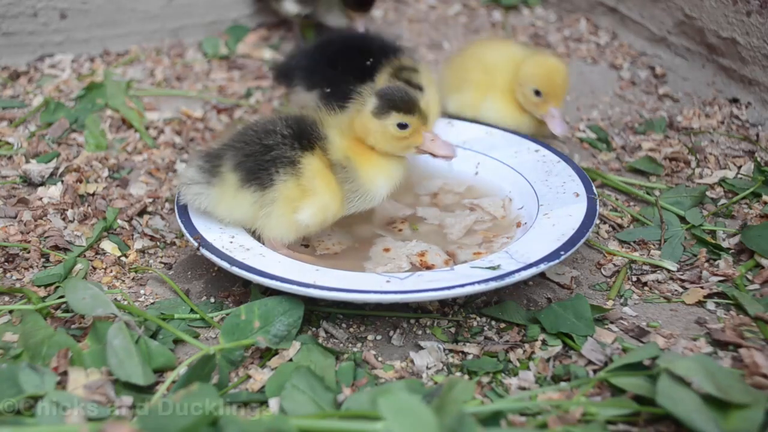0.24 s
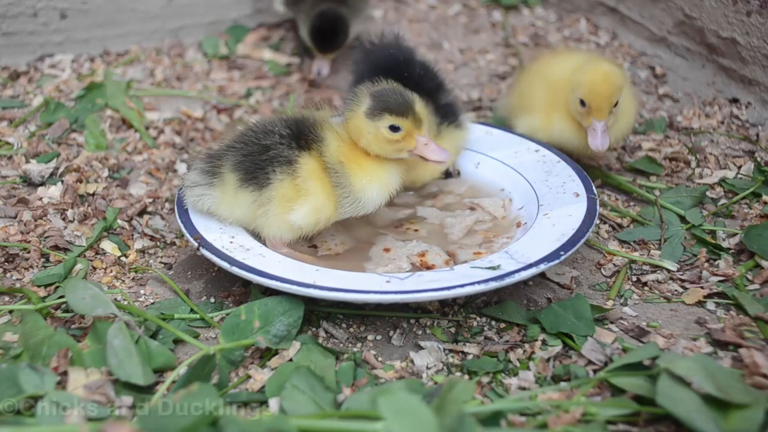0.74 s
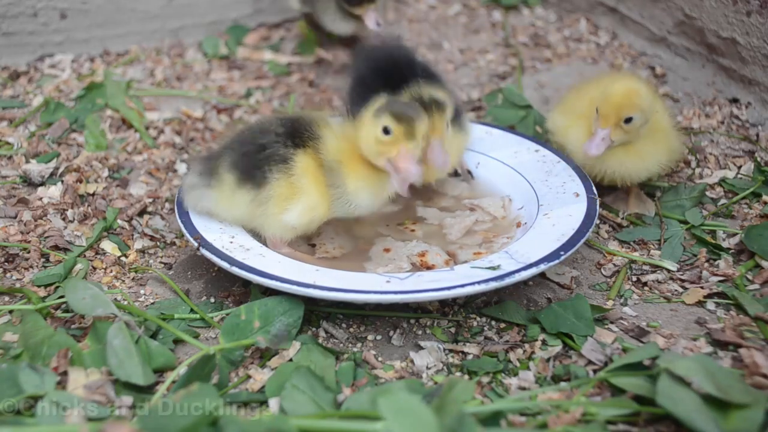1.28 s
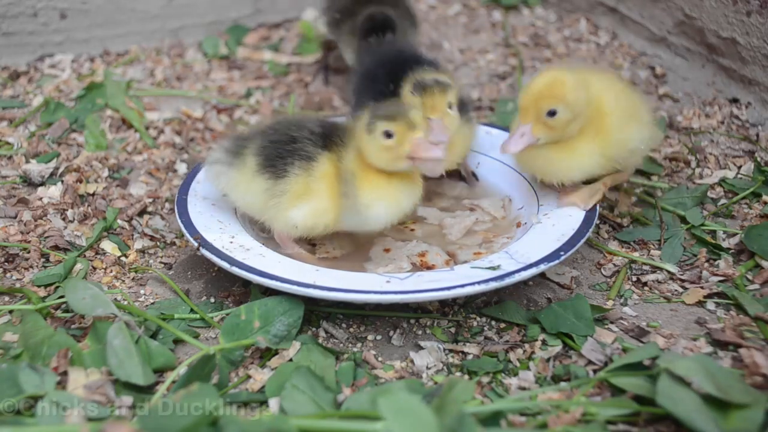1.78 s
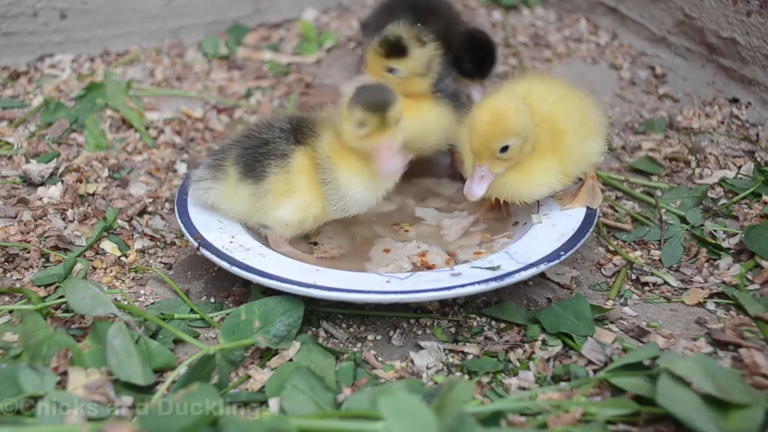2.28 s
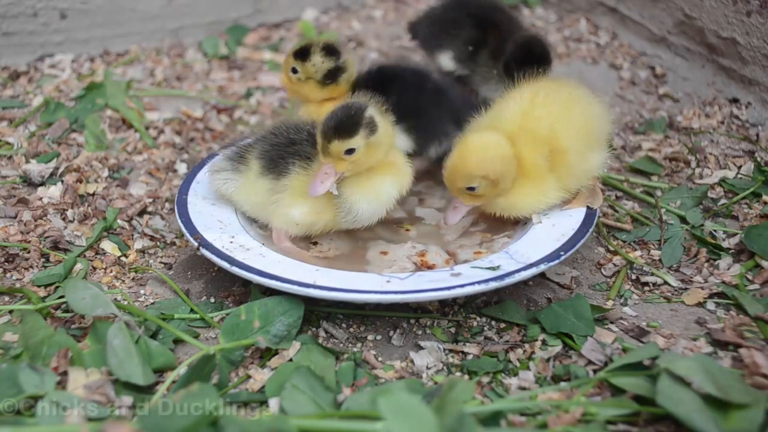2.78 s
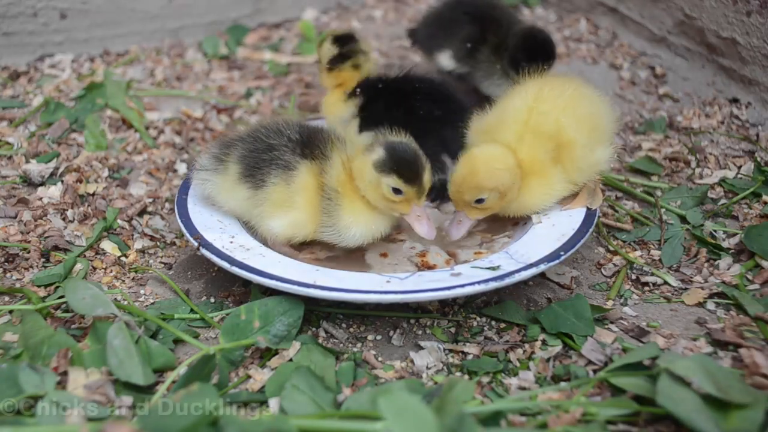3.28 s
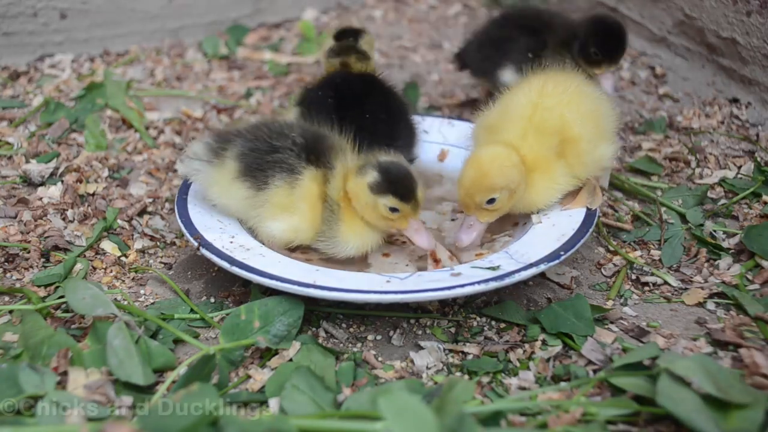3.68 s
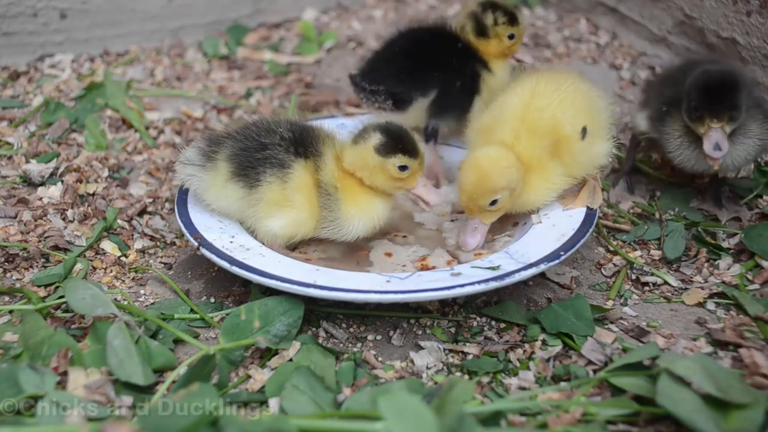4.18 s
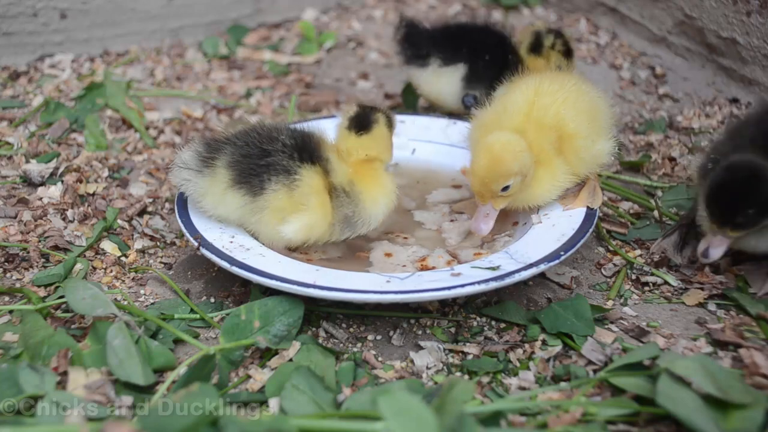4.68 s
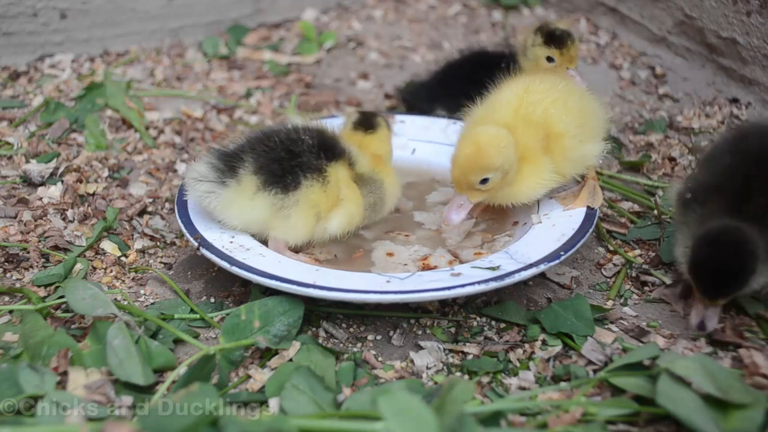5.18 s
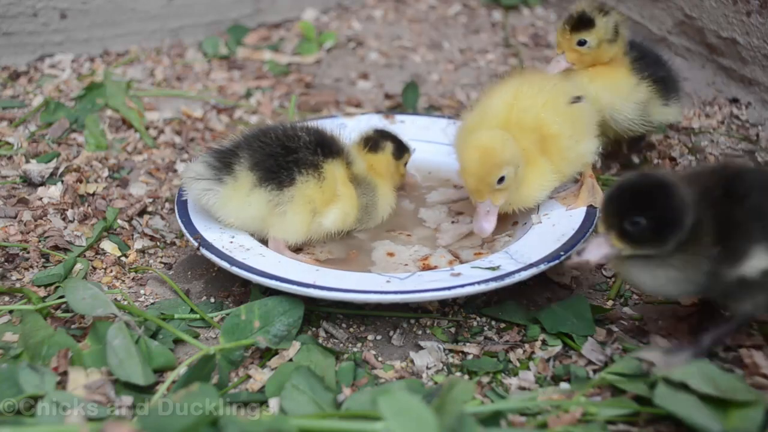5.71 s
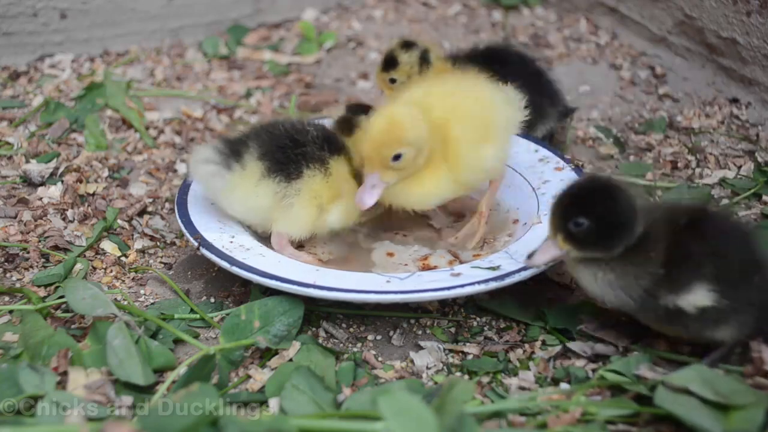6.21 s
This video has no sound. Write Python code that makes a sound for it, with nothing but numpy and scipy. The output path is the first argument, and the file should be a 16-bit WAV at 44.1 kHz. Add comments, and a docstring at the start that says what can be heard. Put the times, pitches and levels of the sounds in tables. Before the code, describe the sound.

Outdoors in a quiet yard, a close microphone catches a small brood of ducklings: pure, trembling chirps and quick downward whistles over a faint murmur of other birds. Dry ticks of bills on a hard dish and tiny wet dabbling come and go. A low engine idle throbs far off, then disappears midway. Later the whistles crowd together and two longer high squeals plunge in pitch.

```python
"""Ducklings at a plate of water

Close to the camera on leaf litter, ducklings give arched peeps, sliding whistles and two long high cries:
trembling near-sine tones, echoed by ground, plate and wall. Bills tick on the plate (noise and ringing modes)
and dabble (dense narrow-band pops). Some way off an engine idles and fades, as low booms with a rumble;
round it all lies quiet outdoor air of coloured noise, with a light wind and one soft bump."""
import sys
import numpy as np
from scipy import signal
from scipy.fft import rfft, irfft, next_fast_len
from scipy.io import wavfile
from scipy.ndimage import uniform_filter1d

SR = 44100
rng = np.random.default_rng(int(sys.argv[2]) if len(sys.argv) > 2 else 0)


def unload_audio(sound):
    """Save the sound as a 16-bit wav file, at the path given as the first command line argument."""
    columns = np.transpose(np.atleast_2d(sound))
    # keep every value between -1 and 1, then stretch to whole-number steps
    steps = np.round(np.clip(columns, -1, 1) * 32767)
    wavfile.write(sys.argv[1], SR, steps.astype(np.int16))


N = 284445
TIME = np.arange(N) / SR  # seconds

# Levels in the tables are relative: gains, chance and filters act on them later.
# Arched peeps close by. Each row: start in seconds, length in seconds, top pitch in Hz, depth of the arch
# as a share of the top, level in dB, loudest point as a share of the call, echo strength in dB.
PEEP_CALLS = [(0.072, 0.044, 2870, 0.32, -20, 0.64, -3.5), (0.337, 0.036, 2690, 0.18, -18.5, 0.59, -9),
              (0.504, 0.046, 2820, 0.2, -12.5, 0.65, -10), (0.873, 0.031, 2430, 0.19, -14.5, 0.47, -17.5),
              (1.426, 0.043, 2114, 0.12, -22.5, 0.36, -8), (1.543, 0.02, 2840, 0.3, -7, 0.54, -12.5),
              (1.919, 0.039, 2704, 0.19, -22.5, 0.92, -14), (2.108, 0.036, 3095, 0.21, -27, 0.64, -7),
              (3.647, 0.044, 2436, .2, -14, 0.59, -15), (3.799, 0.027, 2380, 0.14, -13, 0.62, -18),
              (3.9, 0.042, 2780, 0.27, -13.5, 0.17, -11), (4.572, 0.047, 2325, 0.21, -24.5, 0.8, -4.5),
              (4.707, 0.048, 2302, 0.22, -22, 0.5, -2), (5.85, 0.041, 2787, 0.39, -20.5, 0.43, -7),
              (5.961, 0.048, 2500, 0.34, -20.5, 0.51, 0.5), (6.098, 0.056, 3385, 0.45, -18, 0.33, -11.5)]
# Sliding whistles. Each row: middle in seconds, length in seconds, pitch there in Hz,
# slide in octaves per second, level in dB, loudest point as a share of the call.
WHISTLE_CALLS = [(.139, 0.083, 4270, -2, -38.5, 0.55), (.193, .05, 3515, -4.5, -22.5, 0.4),
                 (.262, 0.045, 3570, -4, -21, 0.33), (.394, 0.05, 2660, -0.5, -26.5, .2),
                 (.61, 0.059, 2685, 5.5, -37.5, 0.55), (.655, 0.087, 3410, -1, -39, 0.59),
                 (.695, 0.028, 2447, 1, -31, 0.38), (1.288, 0.064, 2643, -4, -23, 0.53),
                 (1.405, 0.072, 2910, -4.5, -27, 0.7), (1.523, 0.042, 2960, 3, -28.5, 0.89),
                 (1.56, 0.017, 5080, -6, -32, 0.6), (1.566, 0.049, 4386, -6, -21, 0.39),
                 (1.613, 0.027, 3510, -6, -16, 0.37), (1.652, 0.048, 3156, -2.5, -22, 0.62),
                 (1.674, 0.061, 3500, -1.5, -33.5, 0.63), (1.825, 0.033, 3460, 2, -35.5, 0.54),
                 (1.847, 0.07, 4350, -2.5, -20, 0.58), (1.889, 0.047, 3654, -6, -17, 0.49),
                 (2.082, 0.05, 2950, 2, -37.5, 0.44), (2.09, 0.064, 3840, 2.5, -48.5, .7),
                 (2.258, 0.042, 2712, -2, -27, .25), (2.408, 0.026, 3690, -4, -23, 0.92),
                 (2.455, 0.014, 2678, 4.5, -24, 0.25), (2.562, 0.074, 4340, -4.5, -37, 0.43),
                 (2.68, 0.049, 2697, -6, -14.5, 0.35), (2.71, 0.032, 2690, 3, -37.5, 0.3),
                 (2.757, 0.015, 2790, -3, -37.5, .5), (2.786, 0.065, 4455, -3, -23, 0.51),
                 (2.886, 0.016, 2640, -4, -35.5, 0.33), (2.928, 0.037, 4480, -6.5, -39, 0.42),
                 (3.094, 0.025, 2907, -2.5, -28.5, 0.54), (3.286, 0.033, 2755, -8.5, -20.5, .5),
                 (3.322, 0.035, 4100, -3.5, -22, 0.67), (3.352, 0.018, 3558, -3.5, -15, 0.39),
                 (3.553, 0.07, 4160, -6, -40.5, 0.57), (3.755, 0.053, 4650, -4, -30, 0.45),
                 (3.79, 0.014, 3660, -7, -18.5, 0.43), (3.859, 0.033, 4390, -6.5, -37.5, 0.52),
                 (3.987, .08, 4220, 2, -49.5, 0.38), (4.01, 0.018, 2690, 7, -27.5, 0.33),
                 (4.153, 0.04, 2880, -8, -34, 0.62), (4.19, 0.058, 4300, 1, -36, 0.9),
                 (4.357, 0.037, 2936, 0, -36.5, .6), (4.525, 0.06, 2936, 0.5, -26.5, 0.42),
                 (4.604, 0.066, 3110, 3.5, -35, 0.51), (4.656, 0.048, 4275, -0.5, -29, 0.86),
                 (4.657, 0.047, 2370, -5, -40.5, 0.46), (4.676, 0.033, 2960, 2, -29, 0.43),
                 (4.711, 0.038, 3400, -1.5, -22, 0.44), (4.791, 0.055, 4445, 1, -21, 0.23),
                 (4.81, .04, 3150, 7, -40.5, 0.57), (5.079, 0.03, 3280, 2, -36, .5),
                 (5.155, 0.081, 4290, -1, -47.5, .5), (5.313, 0.071, 4365, -1, -20.5, 0.26),
                 (5.356, 0.043, 2894, 1.5, -37, 0.49), (5.425, .11, 3680, -3, -34, 0.68),
                 (5.46, 0.068, 3044, -0.5, -16.5, 0.8), (5.525, .074, 3590, -0.5, -28, 0.44),
                 (5.575, 0.065, 4730, -3.5, -26, 0.38), (5.6, 0.045, 2984, -7, -32.5, .45),
                 (5.66, 0.084, 4610, -3, -44, .5), (5.69, 0.047, 3310, 1.5, -32.5, .5),
                 (5.783, 0.057, 3480, -1, -40, 0.65), (5.826, 0.053, 4506, -5.5, -27, 0.26),
                 (5.872, 0.058, 4150, -1.5, -33, 0.49), (5.986, 0.076, 4410, -1.5, -30.5, .5),
                 (6.05, 0.064, 2700, -1.5, -39.5, .5), (6.052, 0.052, 4110, 0, -29, 0.58),
                 (6.157, 0.048, 3660, -8.5, -14.5, 0), (6.18, 0.077, 2868, -1, -18.5, 0),
                 (6.24, .04, 4125, 1.5, -28, 0.6), (6.287, 0.08, 4220, -4, -21.5, 0.61),
                 (6.342, 0.034, 3043, -7.5, -21, 0.53)]
# Long high cries. Each row: start in seconds, length in seconds, top pitch in Hz, level in dB.
CRY_CALLS = [(5.496, .135, 5450, -16.5), (5.998, 0.15, 5780, -21)]
# Loudness of the rest of the brood. Each row: time in seconds, level of its calls in dB.
BROOD_LEVEL = [(0, -50), (1.1, -50), (1.8, -46), (2.7, -51), (3.2, -59), (4.2, -54.5), (4.75, -42),
               (5.1, -46), (5.55, -35), (6.15, -46), (6.45, -60)]
# Echoes from ground, plate and wall. Each row: delay in seconds, level in dB.
REFLECTIONS = [(.00093, -35.5), (.0023, -36), (.0046, -13), (.0085, -12), (0.0144, -41.5)]
# Louder bill taps on the plate. Each row: time in seconds, level in dB, brightest ring in Hz,
# level in dB of the dull knock against the tap.
BILL_TAPS = [(0.4342, -27.5, 8850, -21), (0.54, -31, 8700, 5), (.56, -31.5, 10700, 15),
             (0.5686, -28, 6560, 16), (.6144, -34.5, 8870, -18), (0.8968, -32, 9700, -23),
             (1.72, -28, 8600, -10), (3.3417, -31, 7740, -36), (3.442, -34.5, 7740, -6),
             (3.608, -43.5, 7750, -1), (3.679, -41.5, 7480, 1), (3.7637, -38.5, 7400, 1),
             (3.943, -44, 8410, 16), (3.9873, -38.5, 8600, -19), (4.0466, -40.5, 7150, -13),
             (4.099, -25.5, 7370, -5), (4.225, -33.5, 8530, -6), (5.0427, -23.5, 6240, -5.5),
             (5.445, -27, 7500, -6), (5.515, -23, 6980, -26), (5.5743, -29.5, 9740, -24),
             (5.7138, -38, 7500, -16), (6.2546, -30, 12360, -8), (6.3913, -22, 7480, -6.5)]
# What the plate rings with. Each row: pitch in Hz, level in dB, time to fall 60 dB in seconds.
PLATE_MODES = [(5180, 4, 0.042), (6160, 7, 0.053), (7440, 16.5, 0.044), (8380, 6, 0.092), (7800, 6, 0.12),
               (9770, 17, 0.039), (10700, -13.5, 0.034), (13600, -1, 0.033)]
# The plate's hum after a firmer knock: time in seconds, pitch in Hz, time to fall 60 dB in seconds, level in dB.
FIRM_KNOCK_HUM = (.56, 480, 0.8, -40)
# Bouts of dabbling and shuffling. Each row: middle in seconds, length in seconds, level in dB.
DABBLE_BOUTS = [(0.056, 0.62, -51.5), (0.53, 0.31, -46.5), (1.13, 0.19, -53), (1.858, 0.13, -47),
                (4.098, 0.97, -56.5), (5.65, 1, -53.5)]
# Spectrum of the water sounds. Each row: frequency in Hz, level in dB.
WATER_SPECTRUM = [(2000, 13.5), (4000, -2), (5500, -5), (7000, 4), (8600, 7), (10000, -0.5), (12000, -10.5),
                  (15500, -16)]
# Idling engine some way off. Each row: time in seconds, level in dB, exhaust boom in Hz.
ENGINE_IDLE = [(0, -30, 111.6), (.7, -29.5, 134), (.85, -34, 119.7), (1.3, -29.5, 142), (1.7, -32, 138),
               (2.05, -30, 94.4), (2.35, -35.5, 102.8), (3.9, -38.5, 108), (4.2, -48, 100.7),
               (5.25, -51.5, 90), (5.45, -59, 94), (6.45, -64, 94)]
# Its firing rate. Each row: time in seconds, firings per second in Hz.
FIRING_RATE = [(0, 22.2), (1.5, 22.78), (2.2, 21.74), (2.7, 20.71), (4, 20.55), (6.45, 19.9)]
# One soft low bump: middle in seconds, pitch in Hz, length in seconds, level in dB.
SOFT_BUMP = (4.392, 322, .031, -20.5)
# Spectrum of the outdoor air. Each row: frequency in Hz, level in dB.
AIR_SPECTRUM = [(20, -39.5), (45, -23.5), (85, 3.5), (170, -16.5), (350, -15.5), (530, -19.5), (900, -18.5),
                (1300, -22.5), (2000, -30), (3900, -33.5), (5500, -37), (8400, -37.5), (12000, -44),
                (15500, -61)]
# Loudness of the air. Each row: time in seconds, level of its middle range in dB.
AIR_LOUDNESS = [(0, -53.5), (.6, -55), (1.4, -55), (2.7, -55), (3.6, -55.5), (4.3, -55.5), (6.45, -57)]

# A call opens and closes within CALL_EDGE and rounds its peak over about CALL_HOLD (shares of its length).
CALL_EDGE, CALL_HOLD = 0.12, 0.078
PEEP_BEND = 1.7  # shape of a peep's arch: 1 = a roof, 2 = a dome
# A cry climbs by CRY_RISE (share of its top pitch), crests at CRY_CREST (share of its length),
# then plunges by CRY_FALL (share of its top pitch) while growing louder by CRY_SWELL_DB.
CRY_RISE, CRY_CREST, CRY_FALL, CRY_SWELL_DB = 0.059, .54, 0.36, 19
# The open bill brings out any overtone that passes through this resonance.
BILL_HZ, BILL_WIDTH_HZ, BILL_DB = 8920, 570, -42.5
CRACK_LOW_HZ, CRACK_HIGH_HZ = 6000, 13500  # band of a tap's crackle
NIBBLE_DB = -61.5  # quiet nibbling between bouts, before the water's gain
TOP_HZ = 15400  # upper limit of the camera's sound


def peeps(fade_db):
    """Short arches of pitch close by; a bird that faces away sends more of its peep round the yard."""
    direct, away = np.zeros(N), np.zeros(N)
    for s, length, top_hz, depth, db, loudest, echo_db in PEEP_CALLS:
        u = progress(length)
        hz = top_hz * (1 - depth * np.abs(2 * u - 1) ** PEEP_BEND)
        gain = undb(db) * swell(u, loudest, fade_db)
        note = syrinx(hz, gain, jitter=0.0017, flutter_db=3.0, overtone_db=-48)
        add(direct, s, note)
        add(away, s, undb(echo_db) * note)
    # yard() passes its input too, so subtracting it leaves only the echoes of "away"
    return direct - away + yard(away, echo_db=6, scatter_db=-28, t60=0.14)


def whistles(rows, bow, fade_db, jitter, flutter_db):
    """Thin notes on a slide of pitch that steepens downward by bow octaves per s each second."""
    out = np.zeros(N)
    for s, length, hz, slide, db, loudest in rows:
        u = progress(length)
        t = (u - .5) * length
        pitch = hz * 2 ** (slide * t - bow * t ** 2 / 2)
        gain = undb(db) * swell(u, loudest, fade_db)
        add(out, s - length / 2, syrinx(pitch, gain, jitter, flutter_db, overtone_db=-44.5))
    return out


def cries(plunge):
    """A high note climbs softly, then grows loud as it plunges."""
    out = np.zeros(N)
    for s, length, top_hz, db in CRY_CALLS:
        u = progress(length)
        before = (1 - u / CRY_CREST).clip(0)
        after = ((u - CRY_CREST) / (1 - CRY_CREST)).clip(0)
        hz = top_hz * (1 - CRY_RISE * before ** 2 - CRY_FALL * after ** plunge)
        level_db = db - CRY_SWELL_DB * np.cos(np.pi / 2 * after) ** 2
        gain = undb(level_db) * swell(u, 1, 0)
        add(out, s, syrinx(hz, gain, jitter=.009, flutter_db=3, overtone_db=-42))
    return out


def murmuring_brood(count):
    """The rest of the brood gives soft, short arches and falls at random."""
    rows = []
    for k, (when, length, pitch, slide, loud, loudest) in enumerate(rng.random((count, 6))):
        s = (k + when) / count * N / SR
        db = np.interp(s, *np.transpose(BROOD_LEVEL)) + 8 * (loud - .5)
        rows.append((s, .04 + .04 * length, 3000 + 1250 * pitch, 2 - 9 * slide, db, loudest))
    return whistles(rows, bow=202, fade_db=23, jitter=0.0079, flutter_db=4)


def syrinx(hz, gain, jitter, flutter_db, overtone_db):
    """A nearly pure tone that trembles in pitch and strength; the bill colours its faint overtones."""
    phase = 2 * np.pi * np.cumsum(hz * (1 + jitter * tremble(len(hz), 358))) / SR
    tone = np.sin(phase) + undb(overtone_db) * np.sin(2 * phase)
    for k in range(2, 4):
        resonance = undb(BILL_DB) / (1 + ((k * hz - BILL_HZ) / BILL_WIDTH_HZ) ** 2)
        tone = tone + resonance * np.sin(k * phase)
    return np.sqrt(2) * gain * undb(flutter_db * tremble(len(hz), 159.5)) * tone


def progress(length):
    """Runs from 0 to 1 over a call."""
    return np.linspace(0, 1, max(int(length * SR), 64))


def swell(u, loudest, fade_db):
    """A call opens quickly, grows to a rounded loudest point and fades by fade_db per call length."""
    edge = np.sin(np.pi / 2 * np.minimum(1, np.minimum(u, 1 - u) / CALL_EDGE)) ** 2
    return edge * undb(-fade_db * (np.hypot(u - loudest, CALL_HOLD) - CALL_HOLD))


def tremble(size, rate):
    """Chance values of spread 1, rate a second, joined by straight lines over one call."""
    knots = rng.standard_normal(256)
    return np.interp(np.arange(size) * rate / SR, np.arange(256), knots)


def yard(x, echo_db, scatter_db, t60):
    """A few near reflections make gliding tones beat; litter and walls scatter a short tail, a little wide."""
    t = TIME[:SR // 3]
    tails = band(rng.standard_normal((2, len(t))), 1800, 13000) * undb(-60 * t / t60) * (t > .004)
    mid, side = tails * undb(scatter_db) / np.sqrt(np.sum(tails[0] ** 2))
    mid[0] = 1  # the direct sound
    for k, (delay, db) in enumerate(REFLECTIONS):
        mid[int(delay * SR)] += undb(db + echo_db)
        side[int(delay * SR)] += (-1) ** k * undb(db + echo_db)  # from left and right in turn
    return np.array([signal.fftconvolve(x, mid + sign * 0.13 * side)[:N] for sign in (1, -1)])


def taps(rise_s, ring_t60, ring_db, crack_t60, crack_db, plate_db, gain_db):
    """A soft bill scrapes as it lands: a brief crackle, a ring at its own pitch, the plate's modes and a dull knock."""
    out, t = np.zeros(N), TIME[:SR // 8]
    contact = 1 - np.exp(-t / rise_s)
    for s, db, hz, knock_db in BILL_TAPS + light_pecks(count=22, level_db=-57.5, spread_db=14):
        noise, weights = rng.standard_normal(len(t)), rng.standard_normal(len(PLATE_MODES))
        burst = noise * undb(-60 * t / crack_t60)
        crackle = band(burst, CRACK_LOW_HZ, CRACK_HIGH_HZ, order=3)
        plate = sum(w * undb(mode_db - 60 * t / t60) * np.sin(2 * np.pi * f * t)
                    for w, (f, mode_db, t60) in zip(weights, PLATE_MODES))
        ring = unit(band(noise, hz * .965, hz * 1.035)) * undb(-60 * t / ring_t60)
        tap = contact * (undb(crack_db) * crackle + undb(plate_db) * plate + undb(ring_db) * ring)
        knock = undb(knock_db) * contact * band(burst, 1600, 3300, order=3)
        add(out, s, undb(db + gain_db) * (tap / np.abs(tap).max() + knock))
    return band(out, 1000, 12500)


def light_pecks(count, level_db, spread_db):
    """Faint pecks at random moments, as rows like those of BILL_TAPS."""
    return [((k + when) / count * N / SR, level_db + spread_db * (loud - .5), 5800 + 3600 * pitch, -13)
            for k, (when, loud, pitch) in enumerate(rng.random((count, 3)))]


def plate_hum():
    """A low mode of the plate hums after a firm knock, for a third of a second."""
    s, hz, t60, db = FIRM_KNOCK_HUM
    out, t = np.zeros(N), TIME[:SR // 3]
    add(out, s, undb(db - 60 * t / t60) * np.sin(2 * np.pi * hz * t))
    return out


def dabbling(spread, wash, gain_db):
    """Tiny wet pops from bills and feet, each in its own narrow band, dense enough to merge into a fizz."""
    bouts = sum(undb(db) ** 2 * np.exp(-(2 * (TIME - s) / length) ** 2) for s, length, db in DABBLE_BOUTS)
    level_db = 10 * np.log10(undb(NIBBLE_DB) ** 2 + bouts)
    t, grains = TIME[:SR // 30], 0
    for hz in np.geomspace(3000, 13000, 10):
        # about 170 pops a second in each band, a few much stronger than the rest
        pops = (rng.random(N) < 170 / SR) * undb(spread * np.minimum(rng.exponential(size=N), 4.5))
        strength = signal.fftconvolve(pops, undb(-60 * t / 0.032))[:N]
        grains = grains + band(strength * rng.standard_normal(N), hz * 0.826, hz * 1.08)
    fizz = unit(grains) + wash * rng.standard_normal(N)
    return unit(colour(fizz, WATER_SPECTRUM)) * undb(level_db + gain_db)


def engine(boom_s, scatter_db, rumble_db, gain_db):
    """Each firing is a short low boom from the exhaust, over a rumble; distance leaves only the bass."""
    level_db, boom_hz = curves(ENGINE_IDLE)
    rate, = curves(FIRING_RATE)
    firings = np.flatnonzero(np.diff(np.floor(np.cumsum(rate) / SR)))
    out, t = np.zeros(N), TIME[:SR // 10]
    for i, (late, size, tone) in zip(firings, rng.standard_normal((len(firings), 3))):
        phase = 2 * np.pi * boom_hz[i] * (1 + 0.047 * tone) * t
        boom = (t / boom_s) ** 2 * np.exp(-t / boom_s) * (np.sin(phase) + 0.15 * np.sin(2 * phase))
        add(out, i / SR + 0.00039 * late, undb(scatter_db * size) * boom)
    # points of (Hz, dB)
    rumble = colour(rng.standard_normal(N), [(20, -18), (50, -3), (90, -3.5), (200, -2), (300, -16.5),
                                             (500, -23.5), (1200, -54), (5000, -72)])
    return (unit(out) + undb(rumble_db) * unit(rumble)) * undb(level_db + gain_db)


def bump():
    """A soft, hollow bump, a little to the right, swells and dies within about ten cycles."""
    s, hz, length, db = SOFT_BUMP
    out, t = np.zeros(N), TIME[:int(length * SR)]
    add(out, s - length / 2, undb(db) * np.hanning(len(t)) * np.sin(2 * np.pi * hz * t))
    return out * np.array([[.7], [1.15]])


def air(gain_db, side_db, waver_db, wind_db):
    """Outdoor hush that swells and sinks slightly as a whole; a light wind rumbles more on the right."""
    level_db, = curves(AIR_LOUDNESS)
    mid, side = (colour(rng.standard_normal(N), AIR_SPECTRUM) for _ in range(2))
    # two bands may waver on their own; a small waver_db leaves them practically still
    mid = mid + sum(band(mid, hz * .86, hz * 1.16, order=1) * (undb(waver_db * walk(2)) - 1)
                    for hz in (450, 800))
    stereo = mid + undb(side_db) * side * np.array([[1], [-1]])
    hush = stereo / np.std(band(mid, 450, 1500))
    wind = unit(band(rng.standard_normal(N), 22, 100)) * undb(wind_db + 2 * walk(3))
    return hush * undb(level_db + gain_db + walk(6)) + wind * np.array([[.1], [1]])


def undb(db):
    """Decibels to gain."""
    return 10 ** (np.asarray(db) / 20)


def unit(x):
    """Scale to rms 1."""
    return x / np.sqrt(np.mean(x ** 2) + 1e-20)


def curves(table):
    """Each column of a table, joined by straight lines in time."""
    s, *columns = np.transpose(table)
    return [np.interp(TIME, s, c) for c in columns]


def add(track, s, sound):
    """Mix a sound into a track at time s."""
    i = int(np.clip(s * SR, 0, N - 1))
    track[i:i + len(sound)] += sound[:N - i]


def band(x, lo_hz, hi_hz, order=2):
    """Band-pass."""
    sos = signal.butter(order, [lo_hz, min(hi_hz, .48 * SR)], "band", fs=SR, output="sos")
    return signal.sosfilt(sos, x)


def colour(x, spectrum):
    """Give a signal a spectrum of (Hz, dB) points, joined on a log-frequency scale."""
    hz, db = np.transpose(spectrum)
    size = next_fast_len(N)
    f = np.maximum(np.arange(size // 2 + 1) * SR / size, 1)
    return irfft(rfft(x, size) * undb(np.interp(np.log(f), np.log(hz), db)), size)[:N]


def walk(rate):
    """Smoothed chance of rms 1, changing about rate times a second."""
    k = max(int(SR / rate), 1)
    steps = np.repeat(rng.standard_normal(N // 8)[:N // k + 1], k)[:N]
    return unit(uniform_filter1d(steps, k))


def scene():
    """Near peeps have their own echoes; whistles and cries share the yard, and the far brood scatters most."""
    calls = whistles(WHISTLE_CALLS, bow=25, fade_db=33, jitter=0.014, flutter_db=5.0) + cries(plunge=3.0)
    around = yard(calls, echo_db=2.5, scatter_db=-18.5, t60=0.07)
    far = yard(murmuring_brood(count=170), echo_db=1.5, scatter_db=-10, t60=0.057)
    ducklings = peeps(fade_db=24) + undb(-3) * around + undb(-11.0) * far
    bills = taps(rise_s=0.0011, ring_t60=0.036, ring_db=13, crack_t60=0.022, crack_db=-2,
                 plate_db=-9.0, gain_db=2.5)
    water = dabbling(spread=7.4, wash=0.66, gain_db=-3)
    idle = engine(boom_s=0.0065, scatter_db=1.5, rumble_db=-5.0, gain_db=-4.5)
    outdoors = air(gain_db=0.5, side_db=-42, waver_db=0.05, wind_db=-46.5)
    return ducklings + bills + plate_hum() + water + idle + outdoors + bump()


def record(dry):
    """The camera cuts the top with a steep low-pass."""
    return signal.sosfilt(signal.ellip(10, .2, 80, TOP_HZ, fs=SR, output="sos"), dry)


dry = scene()
out = record(dry)
unload_audio(out)
```